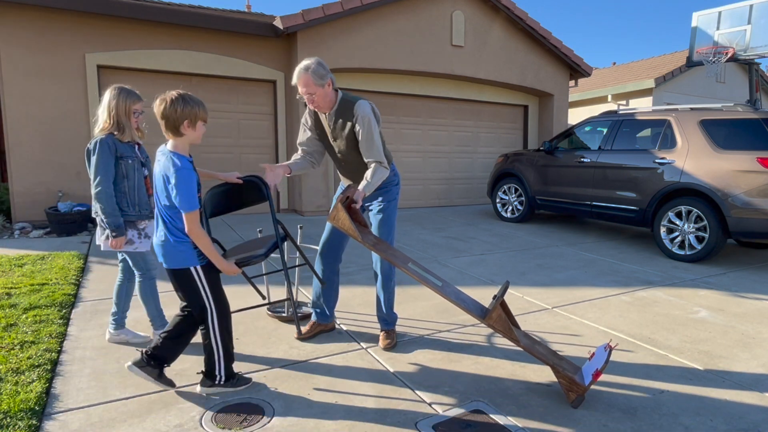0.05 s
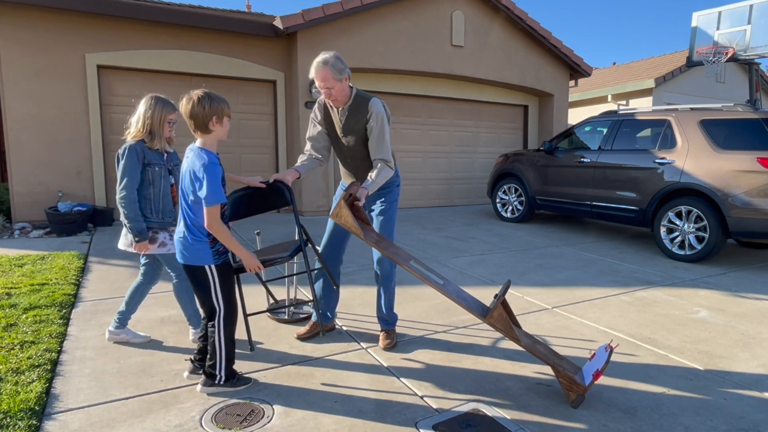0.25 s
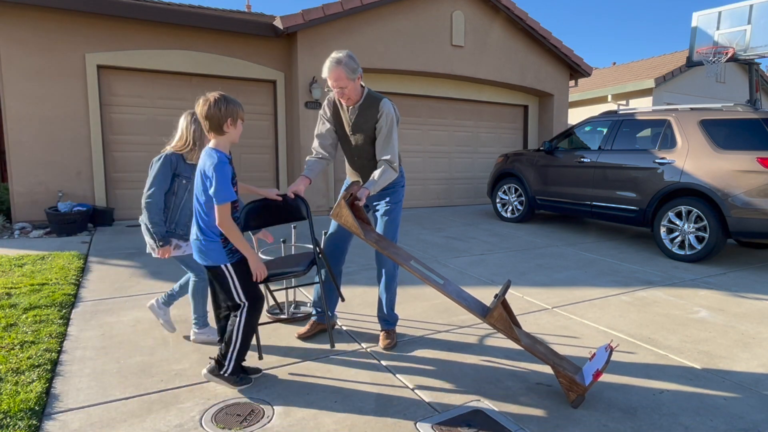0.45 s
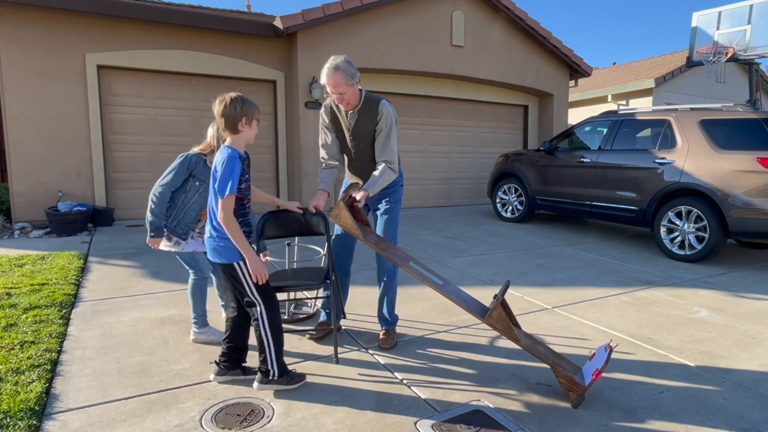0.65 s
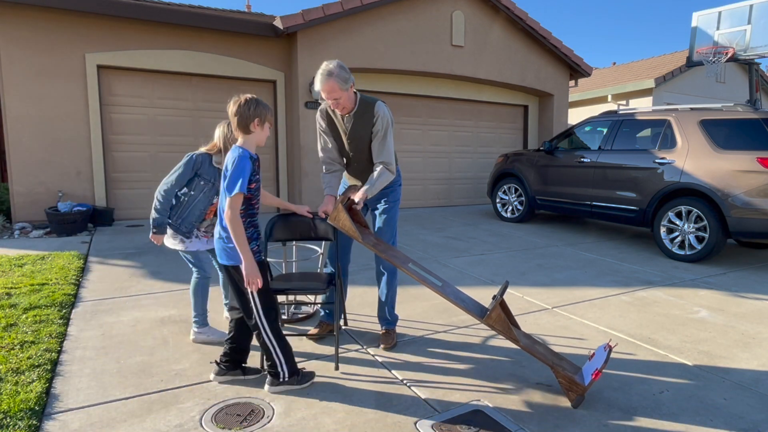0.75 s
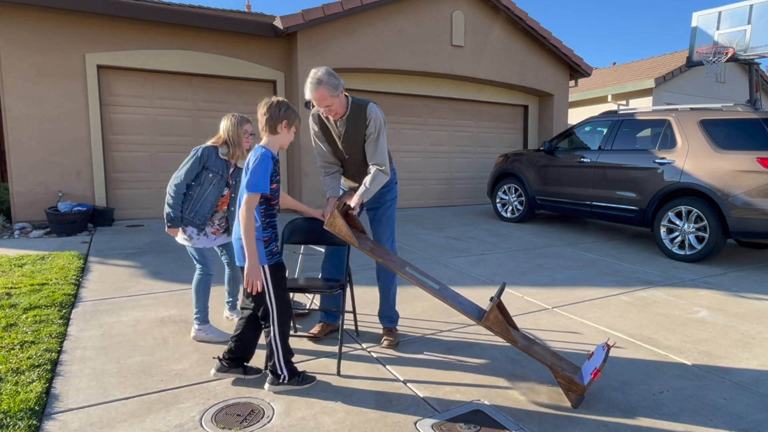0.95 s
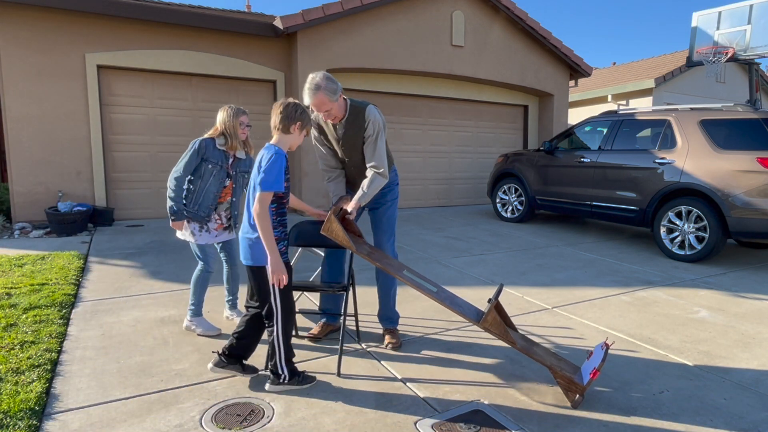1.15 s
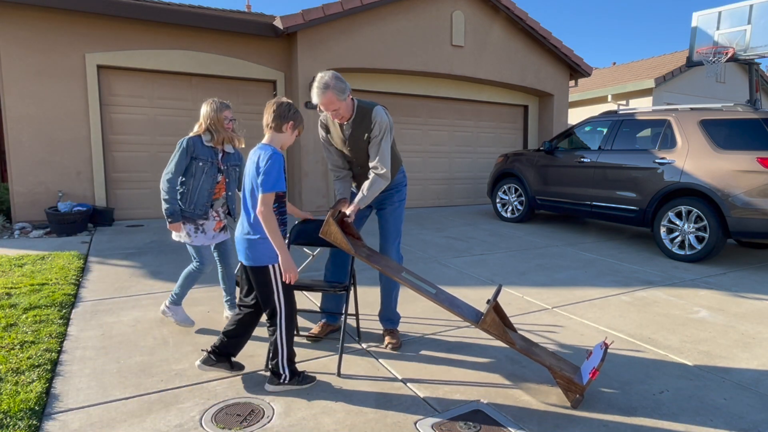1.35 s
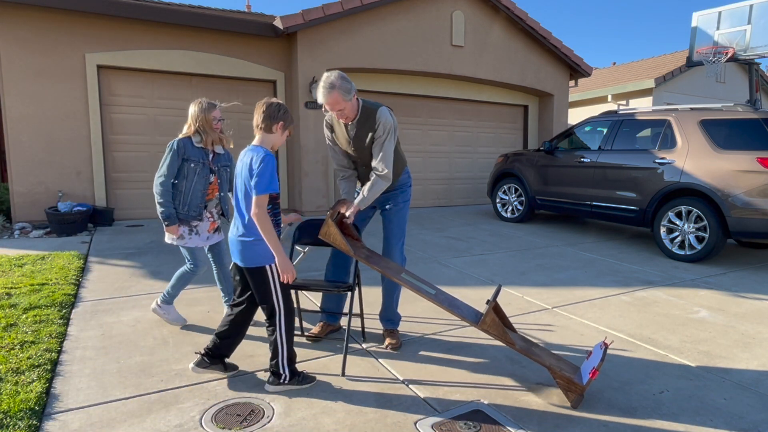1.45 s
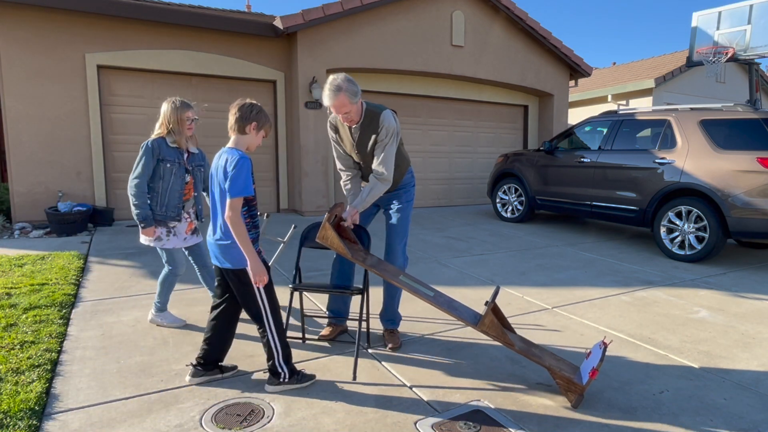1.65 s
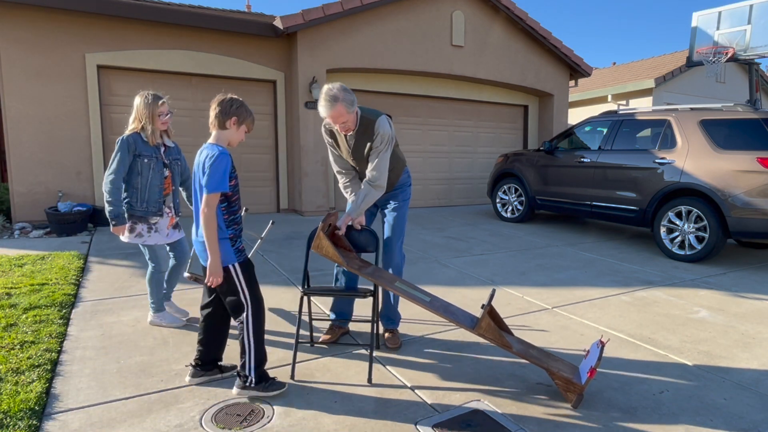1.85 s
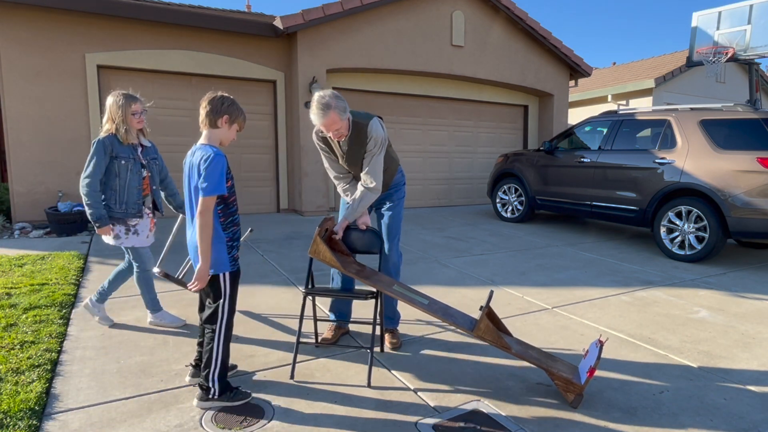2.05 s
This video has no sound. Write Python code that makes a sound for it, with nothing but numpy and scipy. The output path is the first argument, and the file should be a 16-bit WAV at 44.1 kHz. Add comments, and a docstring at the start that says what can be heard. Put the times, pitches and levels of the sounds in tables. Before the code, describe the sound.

A metal folding chair taps loosely, then clatters and scrapes onto a concrete driveway in two bursts

```python
"""Loose metal joints tap as a folding chair is carried in; then its legs knock and scrape on a concrete driveway.
Taps are small blows on ringing joints. Knocks and drag are gritty clicks that shake the seat pan, a middle
clatter and the tube frame; a few tubes ring on alone and one small low thud falls between the knocks.
A house wall throws a short echo back. Soft footsteps, a faint whistle and handling noise lie below;
the quiet between the knocks is almost empty. The listening point is a phone a few metres away."""
import sys
import numpy as np
from scipy import signal
from scipy.io import wavfile
from scipy.ndimage import uniform_filter1d

SR = 44100
rng = np.random.default_rng(int(sys.argv[2]) if len(sys.argv) > 2 else 0)


def wav_out(sig):
    """Save sig, one row per channel (or a flat mono array), as 16-bit PCM at SR to the path in sys.argv[1]."""
    wavfile.write(sys.argv[1], SR, np.round(np.clip(np.atleast_2d(sig).T, -1, 1) * 32767).astype(np.int16))


def decibels_to_gain(level_db):
    """Convert a level in decibels to a linear amplitude gain (20 dB per decade)."""
    exponent = np.asarray(level_db, float) / 20
    return 10 ** exponent


N = 93183  # samples


def evened(x):
    """Scales a signal to unit rms."""
    return x / np.sqrt(np.mean(x ** 2) + 1e-20)


def colour(x, points, lo_hz=0, hi_hz=SR):
    """Minimum-phase filter with the tabled spectrum between two soft edges, unit power on white noise."""
    hz = abs(np.fft.fftfreq(4096, 1 / SR)) + 1
    f, level = np.transpose(points)
    gain = decibels_to_gain(np.interp(np.log(hz), np.log(f), level))
    gain = gain / np.sqrt((1 + (lo_hz / hz) ** 8) * (1 + (hz / hi_hz) ** 8))
    log_gain = np.log(np.maximum(gain / gain.max(), 1e-5))
    # the Hilbert transform of the log gain supplies the causal phase
    response = np.fft.ifft(np.exp(signal.hilbert(log_gain).conj())).real[:2048]
    return signal.oaconvolve(x, response / np.linalg.norm(response))[:N]


def ring(x, modes, t60, fickle_db):
    """Bank of decaying resonances (Hz, dB), each driven by its own share that jumps every 512 samples."""
    t, out = np.arange(SR // 6) / SR, np.zeros(N)
    shares = np.clip(rng.standard_normal((len(modes), N // 512 + 2)), -2, 2)
    for (hz, db), share in zip(modes, shares):
        envelope = decibels_to_gain(-60 * t / t60) * (1 - np.exp(-t / .001))
        response = envelope * np.sin(2 * np.pi * (hz * t + rng.random()))
        drive = x * decibels_to_gain(fickle_db * np.repeat(share, 512)[:N])
        out += signal.oaconvolve(drive, decibels_to_gain(db) * response / np.linalg.norm(response))[:N]
    return out / np.linalg.norm([decibels_to_gain(db) for hz, db in modes])


def blows(times, dbs, t60s, rises):
    """Envelope of bursts that swell around their time and die away; overlapping bursts add in power."""
    t, power = np.arange(N) / SR, np.zeros(N)
    for s, db, t60, rise in np.broadcast(times, dbs, t60s, rises):
        since = np.maximum(t - s + .5 * rise, 0)
        decay = decibels_to_gain(db - 60 * np.maximum(since - rise, 0) / max(t60, .01))
        swell = np.minimum(since / rise, 1) ** 2
        power += (decay * swell) ** 2
    return np.sqrt(power)


def flutter(hz, samples):
    """A tone along the curve hz whose strength and phase wander, more slowly for more samples."""
    noise = rng.standard_normal((2, N))
    slow = uniform_filter1d(uniform_filter1d(noise, samples, axis=1), samples, axis=1)
    carrier = np.exp(2j * np.pi * np.cumsum(hz * np.ones(N)) / SR)
    return evened(((slow[0] + 1j * slow[1]) * carrier).real)


CLICKS_PER_S, CLICK_SPREAD_DB = 3500, 3.5


def grit():
    """Rough contact: dense clicks of random sign, a few of them large."""
    size = decibels_to_gain(CLICK_SPREAD_DB * np.minimum(rng.exponential(1, N), 5)) * rng.choice([-1., 1.], N)
    return evened(size * (rng.random(N) < CLICKS_PER_S / SR))


FICKLE_DB = 3.5  # how unevenly a blow wakes the modes
SHEET_T60_S = .025


def sheet(x):
    """Thin sheet metal: dense short modes at random places, struck unevenly; flat on average."""
    hz = 1300 + 230 * (np.arange(60) + rng.random(60))
    return ring(x, [(f, 0) for f in hz], SHEET_T60_S, 1.89 * FICKLE_DB)


# legs knocking the concrete: t/s, seat pan level/dB, middle level/dB, frame level/dB (before trim), rattle t60/s
LEG_KNOCKS = [(0.695, -15.5, -28, -42, 0.1), (0.718, -38, -28.5, -31, 0.059),
              (0.748, -10, -24.5, -34, 0.14), (0.759, -7.5, -43, -29, 0.05),
              (0.776, -39.5, -21, -28.5, 0.061), (0.818, -22, -32, -32, 0.16),
              (0.826, -8, -20.5, -31, 0.24), (0.847, -19.5, -36, -25.5, 0.36),
              (0.861, -12, -21.5, -33, 0.31), (0.892, -2, -15, -17, 0.046), (0.905, -12, -23, -21.5, 0.14),
              (0.934, -7.5, -13.5, -21, 0.053), (0.955, -16, -23, -27, 0.11),
              (0.987, -5.5, -17.5, -21, 0.091), (1, -9.5, -26.5, -31.5, 0.1),
              (1.026, -23, -24.5, -28, 0.12), (1.072, -20.5, -27.5, -30, 0.082),
              (1.128, -17, -27.5, -30.5, 0.23), (1.164, -20, -49, -23, 0.11),
              (1.209, -26, -24, -21.5, 0.063), (1.257, -32, -36.5, -33, 0.091), (1.527, -31, -26, -23, 0.2),
              (1.536, -12.5, -17, -17.5, 0.088), (1.557, -9.5, -24, -26.5, 0.25),
              (1.585, -36, -24, -36, 0.099), (1.616, -21, -27, -28.5, 0.078),
              (1.65, -27.5, -36, -33.5, 0.19), (1.724, -15.5, -18.5, -32, 0.023),
              (1.732, -14, -23, -25, 0.24), (1.783, -18, -14, -25, 0.015), (1.792, -6.5, -17.5, -17.5, 0.1),
              (1.811, -7.5, -17.5, -21, 0.15), (1.843, -12.5, -23.5, -37, 0.12),
              (1.919, -18.5, -31.5, -34.5, 0.27), (2.011, -25, -27, -28.5, 0.21),
              (2.037, -11, -21, -10, 0.14), (2.044, -11.5, -16, -32, 0.16),
              (2.081, -36, -19.5, -20.5, 0.11)]
# legs dragging: t/s, drag level/dB, brightness/dB (both before the balance in chair())
LEG_DRAG = [(0.667, -50.5, -18), (.72, -44.5, -7), (.9, -37, 1), (1.02, -43, -3), (1.13, -51.5, 4.5),
            (1.3, -83.5, -19), (1.34, -110, 2), (1.492, -110, 15), (1.519, -32.5, -7), (1.57, -26, -4.5),
            (1.69, -52, -4.5), (1.74, -30, -20), (1.85, -27.5, 1.5), (1.99, -36, -20), (2.04, -22.5, -17),
            (2.11, -25.5, -16)]
# seat pan modes: f/Hz, relative level/dB
PAN_MODES = [(330, -18.5), (478, 25.5), (600, -4.5), (650, -2), (705, 21.5), (765, -2.5), (870, -19.5),
             (1040, 8.5), (1125, -18), (1265, 6.5)]
# tube frame modes: f/Hz, relative level/dB
FRAME_MODES = [(2575, -4), (3130, -4), (3440, -4), (3545, -2), (3800, 0), (4500, -1), (5100, -6),
               (5525, -4), (10900, -13), (11230, -12), (11590, -8)]
# broad clatter of the metal, also the bright tick of a tap: f/Hz, relative level/dB per Hz
CLATTER_COLOUR = [(35, -45.5), (70, -30), (323, -6), (398, -10), (480, 1.5), (698, 2.5), (1860, -9),
                  (4530, -15.5), (6900, -25.5), (11800, -29), (16000, -35.5)]
PAN_TOP_HZ, FRAME_BOTTOM_HZ = 1200, 3000  # crossovers of the clatter
PAN_T60_S, FRAME_T60_S = .07, .06
PAN_DB, FRAME_DB, SHEET_DB = -10, -12, -10  # ringing against the broad clatter
PAN_TRIM_DB, MIDDLE_TRIM_DB, FRAME_TRIM_DB = -8, -2.5, -1.5
SWELL_SHARE = 0.041  # share of the rattle time that adds to a knock's rise
SHARED_GRIT = 0.38  # weight of the clicks felt by all parts at once


def chair():
    """Knocks and drag shake the seat pan, the middle clatter and the frame by their own amounts."""
    t, common = np.arange(N) / SR, grit()
    knock_s, pan_db, middle_db, frame_db, rattle_t60 = np.transpose(LEG_KNOCKS)
    drag_s, drag_db, bright_db = np.transpose(LEG_DRAG)

    def contact(knock_db, rub_db):
        knocks = blows(knock_s, knock_db, rattle_t60, SWELL_SHARE * rattle_t60 + 0.0037)
        rub = decibels_to_gain(np.interp(t, drag_s, rub_db, -120))
        return np.hypot(knocks, rub) * (SHARED_GRIT * common + (1 - SHARED_GRIT) * grit())

    low = contact(pan_db + PAN_TRIM_DB, drag_db - 3)
    middle = contact(middle_db + MIDDLE_TRIM_DB, drag_db + .5 * bright_db - 5)
    high = contact(frame_db + FRAME_TRIM_DB, drag_db + bright_db)
    clatter = colour(low, CLATTER_COLOUR, 0, PAN_TOP_HZ)
    clatter = clatter + colour(middle, CLATTER_COLOUR, PAN_TOP_HZ, FRAME_BOTTOM_HZ)
    clatter = clatter + colour(high, CLATTER_COLOUR, FRAME_BOTTOM_HZ)
    sheet_ring = decibels_to_gain(SHEET_DB) * sheet(clatter)
    pan_ring = decibels_to_gain(PAN_DB) * ring(low, PAN_MODES, PAN_T60_S, FICKLE_DB)
    frame_ring = decibels_to_gain(FRAME_DB) * ring(high, FRAME_MODES, FRAME_T60_S, FICKLE_DB)
    return clatter + sheet_ring + pan_ring + frame_ring


# loose joints tapping: t/s, tap level/dB, dull part level/dB, bright part level/dB (before trim)
JOINT_TAPS = [(0.0182, -20.5, -52, -41), (0.0298, -25, -36.5, -43), (0.0522, -26, -58, -67),
              (0.0836, -28.5, -46, -87), (0.0933, -62, -69, -87), (0.115, -41.5, -60, -55),
              (0.249, -40.5, -68, -78), (0.366, -75, -55.5, -55), (0.411, -43.5, -79.5, -58),
              (0.4255, -40.5, -55, -58), (0.482, -40, -37, -59), (0.496, -29, -35, -73),
              (0.513, -26, -31, -41), (0.5226, -15.5, -52, -32.5), (0.533, -19, -26, -55),
              (0.5489, -23.5, -33.5, -37), (0.5638, -19.5, -32, -60), (0.5855, -20.5, -34, -39),
              (0.6836, -24, -33.5, -36)]
# joint modes: f/Hz, relative level/dB
JOINT_MODES = [(1370, 4.5), (1520, 3), (1715, 3.5), (1880, 1.5), (2160, 1), (2420, -8.5), (2700, -11.5)]
# hollow note under the taps: f/Hz, relative level/dB
HOLLOW_MODES = [(620, -5), (750, -4), (810, 2), (1060, -8), (240, 2)]
# a soft contact: f/Hz, relative level/dB per Hz
SOFT_CONTACT = [(200, -18.5), (600, -5), (2200, -5), (3200, -3), (8000, -51)]
TAP_TRIM_DB, DULL_TRIM_DB, BRIGHT_TRIM_DB = 3.5, -10, -6.5
CHATTER_T60_S, CHATTER_RISE_S = 0.042, 0.0005
JOINT_T60_S, HOLLOW_T60_S = .03, .055


def taps():
    """One blow and a short chatter ring the joint; a longer push rings the hollow note; a bright tick on top."""
    s, tap_db, dull_db, bright_db = np.transpose(JOINT_TAPS)
    noise, jolt = rng.standard_normal((3, N)), np.zeros(N)
    jolt[(s * SR).astype(int)] = decibels_to_gain(tap_db + TAP_TRIM_DB) * rng.choice([-1., 1.], len(s))
    jolt = jolt + blows(s, tap_db - 23, CHATTER_T60_S, CHATTER_RISE_S) * noise[2]
    push = blows(s, dull_db + DULL_TRIM_DB, 1.4 * CHATTER_T60_S, 3 * CHATTER_RISE_S) * noise[0]
    tick = blows(s, bright_db + BRIGHT_TRIM_DB, 1.9 * CHATTER_T60_S, 4 * CHATTER_RISE_S) * noise[1]
    joint = ring(colour(jolt, SOFT_CONTACT), JOINT_MODES, JOINT_T60_S, 2.5)
    hollow = ring(colour(push, SOFT_CONTACT), HOLLOW_MODES, HOLLOW_T60_S, 2)
    return joint + hollow + colour(tick, CLATTER_COLOUR, FRAME_BOTTOM_HZ)


# single tubes that ring out, and one small low thud at 1.484 s: t/s, f/Hz, level/dB, t60/s
PINGS_AND_THUD = [(1.168, 5180, -34, .06), (1.217, 5750, -33, .11), (1.268, 5750, -43, .13),
                  (1.268, 7620, -47, .1), (1.262, 11230, -49, .1), (1.540, 11590, -45, .3),
                  (1.793, 10900, -38, .12), (1.215, 11590, -46, .15), (1.484, 400, -50, .04)]


def pings_and_thud():
    """Dying tones of single tubes and one small low thud, each a steady sine plus a fluttering copy."""
    t, out = np.arange(N) / SR, np.zeros(N)
    for s, hz, db, t60 in PINGS_AND_THUD:
        tone = .7 * np.sin(2 * np.pi * hz * t) + .45 * flutter(hz, 160)
        out += blows(s, db, t60, .004) * tone
    return out


# shoes on the concrete: t/s, level/dB, t60/s
FOOTSTEPS = [(0.062, -57, 0.14), (0.258, -61, 0.24), (0.436, -59.5, 0.043), (0.528, -47.5, 0.34)]
# sole against concrete: f/Hz, relative level/dB per Hz
SOLE_COLOUR = [(60, -16.5), (120, -10), (250, -11), (500, -5), (800, -17), (3000, -36)]


def steps():
    """Shoes on the concrete: soft low scuffs of noise with a 19 ms rise."""
    return colour(blows(*np.transpose(FOOTSTEPS), 0.019) * rng.standard_normal(N), SOLE_COLOUR)


ECHO_DB, ECHO_T60_S, ECHO_DELAY_S = -16, 0.18, .012


def wall(x):
    """Sparse reflections of random sign from the house front and the car, duller than the direct sound."""
    t = np.arange(SR // 3) / SR
    signs = rng.choice([-1., 1.], len(t))
    sparse = rng.random(len(t)) < .05
    echoes = signs * sparse * decibels_to_gain(-60 * t / ECHO_T60_S) * (t > ECHO_DELAY_S)
    echoes = signal.lfilter([1], [1, -.5], echoes)  # takes treble off
    return decibels_to_gain(ECHO_DB) * signal.oaconvolve(x, echoes / np.linalg.norm(echoes))[:N]


# a faint thin whistle: t/s, level/dB
WHISTLE_LEVEL = [(1.361, -94.5), (1.396, -62), (1.445, -73.5), (1.469, -52.5), (1.485, -67), (1.51, -62.5)]
# the whistle itself and two weak companions: share of the pitch [ratio], level/dB
WHISTLE_PARTS = [(1, 0), (.635, -16), (1.43, -24)]
WHISTLE_HZ, GLIDE_HZ_PER_S = 4290, 1100  # pitch at the first time in the table, upward glide


def whistle():
    """A narrow, fluttering band of noise gliding upward with two weak companions."""
    t, (s, db) = np.arange(N) / SR, np.transpose(WHISTLE_LEVEL)
    hz = WHISTLE_HZ + GLIDE_HZ_PER_S * (t - s[0])
    tones = sum(decibels_to_gain(part_db) * flutter(ratio * hz, 170) for ratio, part_db in WHISTLE_PARTS)
    return decibels_to_gain(np.interp(t, s, db, -120, -120)) * tones


# faint handling noise: t/s, level/dB
RUSTLE_LEVEL = [(0, -47.5), (.05, -86), (0.111, -96), (.125, -66), (.17, -107), (0.213, -90),
                (0.229, -77.5), (0.329, -77.5), (.37, -68.5), (.47, -71.5), (.6, -51), (.65, -68.5),
                (1.349, -78.5), (1.5, -67)]
# colour of the handling noise: f/Hz, relative level/dB per Hz
RUSTLE_COLOUR = [(100, -23), (600, 1), (1100, -14), (1800, -3), (2800, -18), (4000, -4), (6000, -24),
                 (7000, -15), (15000, -30)]


def rustle():
    """Handling noise: soft coloured noise that comes and goes."""
    level = decibels_to_gain(np.interp(np.arange(N) / SR, *np.transpose(RUSTLE_LEVEL)))
    return level * colour(rng.standard_normal(N), RUSTLE_COLOUR)


def scene():
    """Chair, thud and shoes with their echo; the whistle and the handling noise stay dry."""
    near = chair() + taps() + steps() + pings_and_thud()
    return (near + wall(near) + whistle() + rustle())[None]


def band_limit(x):
    """A steep low-pass at the top of the band."""
    return signal.sosfilt(signal.butter(12, 16300, fs=SR, output="sos"), x)


MIC_LOW_HZ = 100
GATE_DB, GATE_DEPTH_DB = -106, 18  # threshold per spectral bin, deepest cut


def record(dry):
    """Bass roll-off, a noise suppressor that lowers weak parts of the spectrum, then a 16 kHz band limit."""
    x = signal.sosfilt(signal.butter(2, MIC_LOW_HZ, "high", fs=SR, output="sos"), dry)
    spectrum = signal.stft(x, nperseg=512, noverlap=384)[2]
    # power smoothed over 9 bins and 5 frames decides the cut
    power = uniform_filter1d(uniform_filter1d(abs(spectrum) ** 2, size=9, axis=1), size=5, axis=2)
    level_db = 10 * np.log10(abs(power) + 1e-20)
    spectrum = spectrum * decibels_to_gain(-np.clip(GATE_DB - level_db, 0, GATE_DEPTH_DB))
    x = signal.istft(spectrum, nperseg=512, noverlap=384)[1][:, :N]
    mix = signal.oaconvolve(x, signal.firwin(255, 16000, fs=SR)[None], "same")
    return band_limit(mix)


dry = scene()
out = record(dry)
wav_out(out)
```